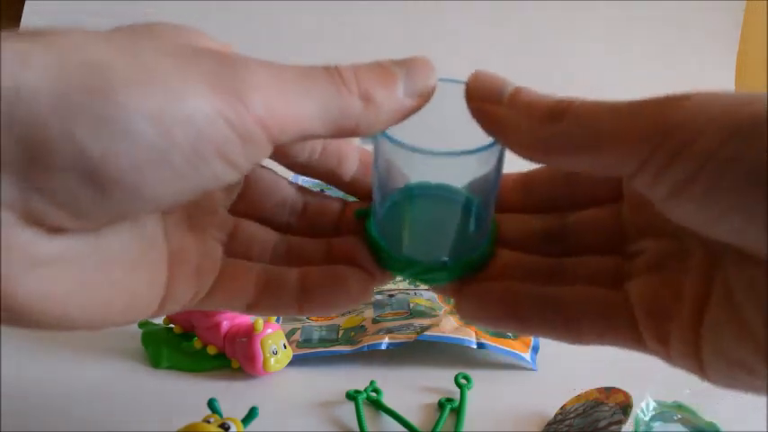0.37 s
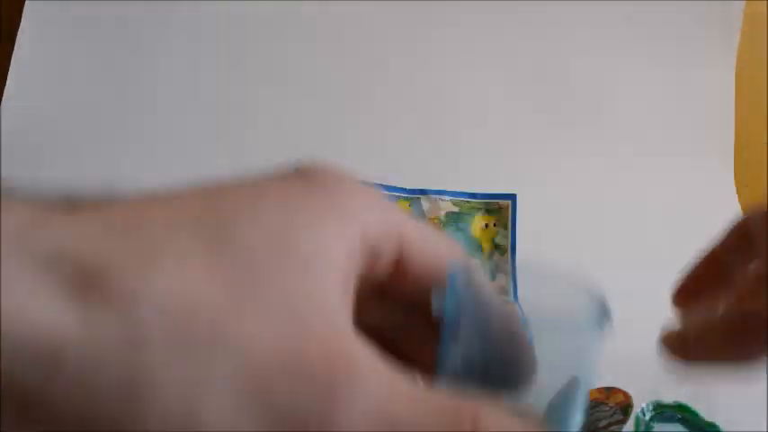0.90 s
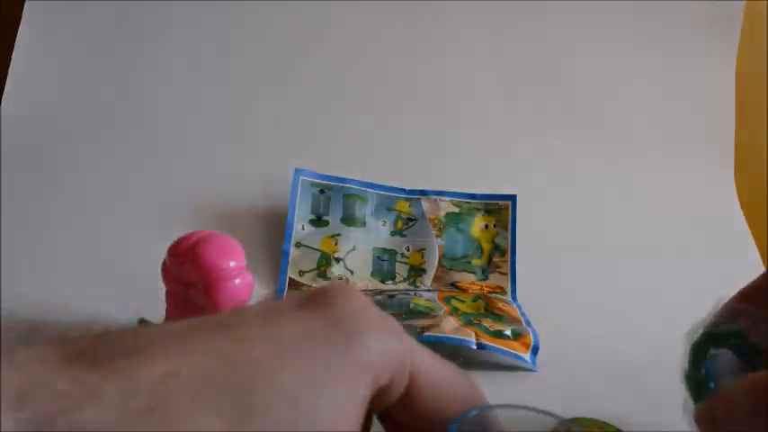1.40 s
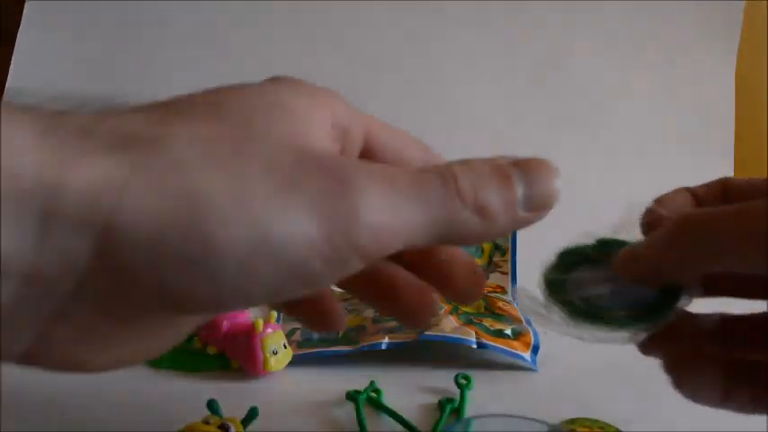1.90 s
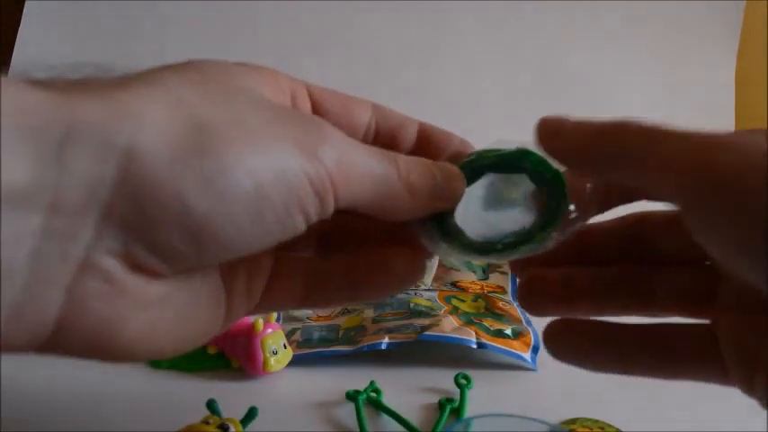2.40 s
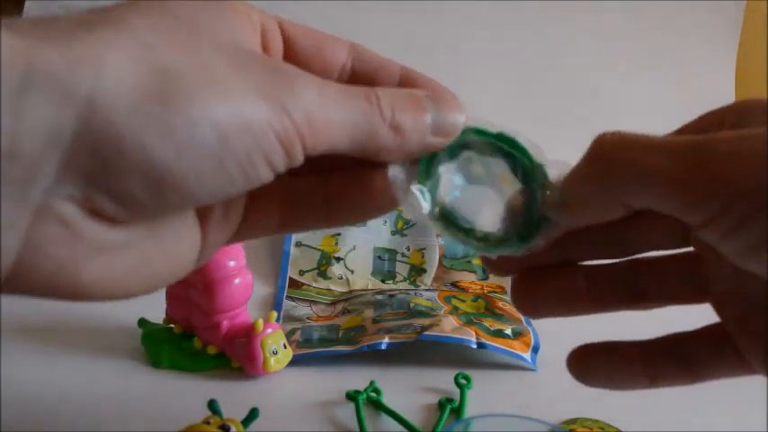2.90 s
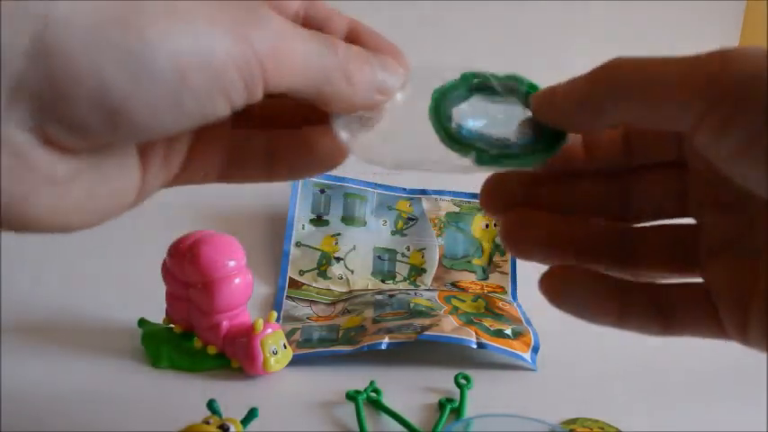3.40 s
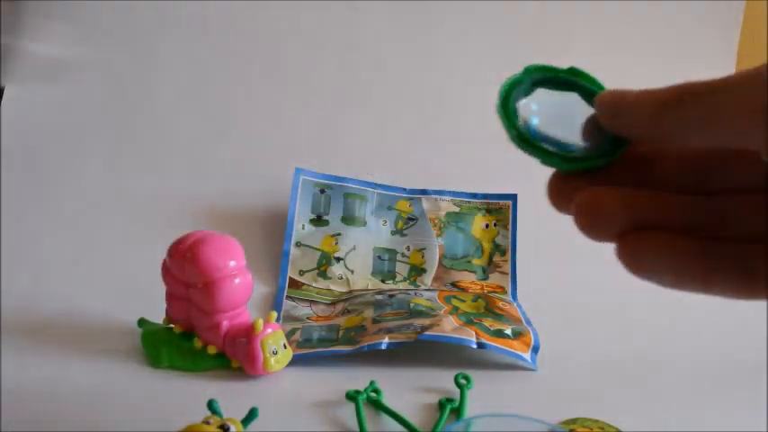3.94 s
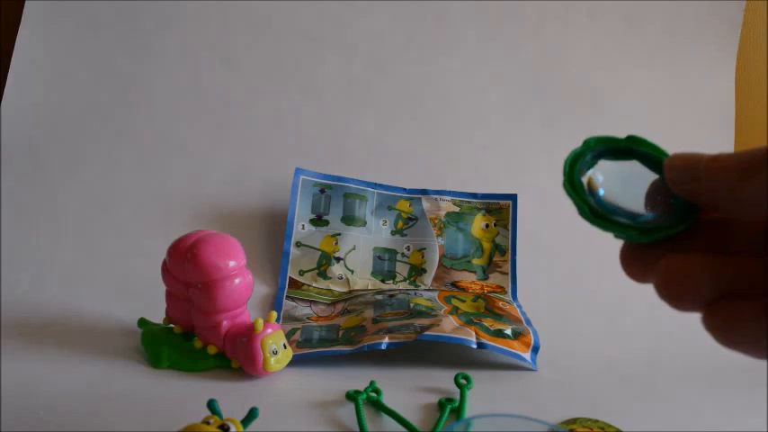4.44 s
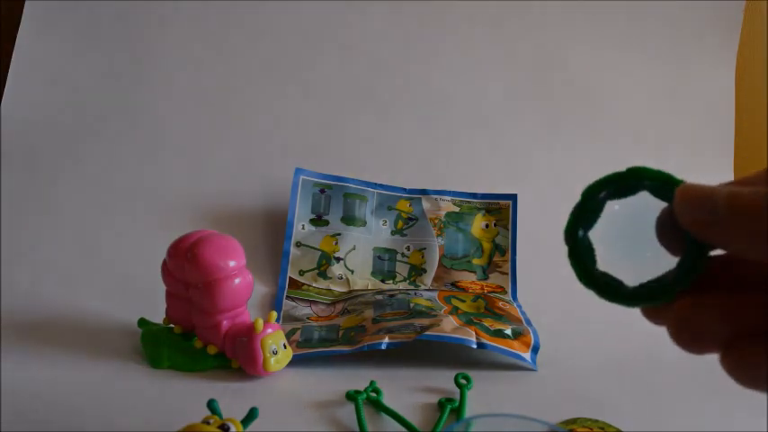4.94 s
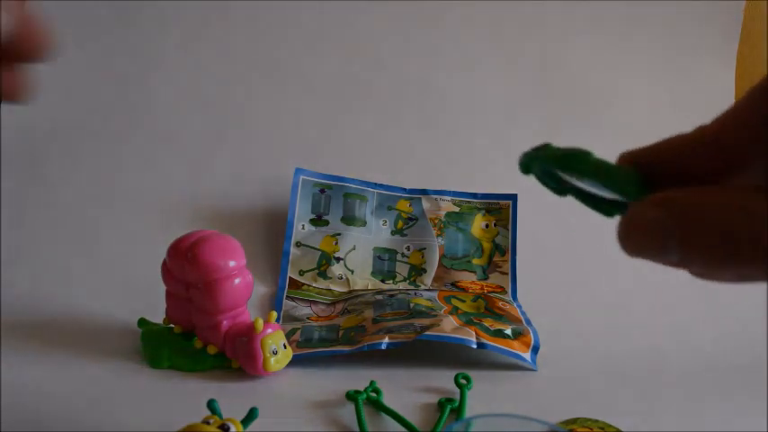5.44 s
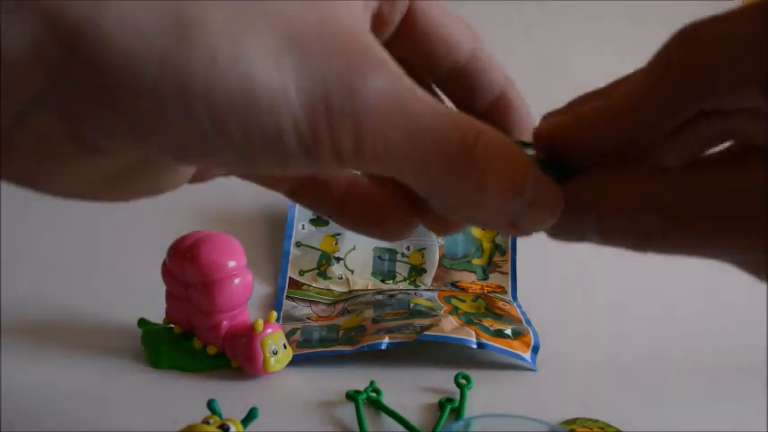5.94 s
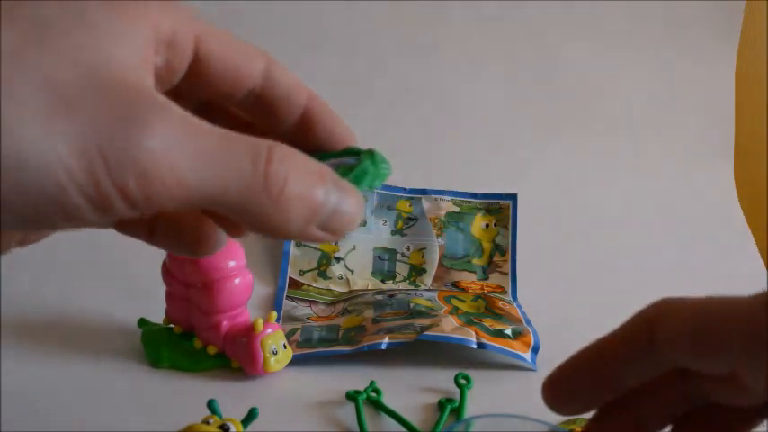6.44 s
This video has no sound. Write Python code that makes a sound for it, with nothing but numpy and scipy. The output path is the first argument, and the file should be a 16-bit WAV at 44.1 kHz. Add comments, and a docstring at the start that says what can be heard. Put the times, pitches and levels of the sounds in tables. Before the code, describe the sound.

Close up in a small room with steady hiss, a light tap and low wobble come first. A plastic cup is put down with hollow knocks and a brief scrape, then stiff clear film crackles and snaps loudly as it is pulled off a plastic ring. The crinkling thins out, leaving near quiet, a few small taps with faint snaps, then only hiss.

```python
"""A part taps a table and the camera stand wobbles, then a plastic cup is set down and slid: ringing modes, low rubbing.
Hands pull a stiff clear film off a toy ring: creases snap as bursts of brief modes over finer random crackle,
while fingers rub and the ring is tapped. Late on, a shell taps the table among a few last snaps.
A small room answers throughout with a bounce and a short noise tail, over steady microphone hiss."""
import sys
import numpy as np
from scipy import signal
from scipy.fft import rfft, irfft
from scipy.io import wavfile
from scipy.ndimage import uniform_filter1d

SR = 44100
rng = np.random.default_rng(int(sys.argv[2]) if len(sys.argv) > 2 else 0)


def gain_from_decibels(decibels):
    """Convert decibel values to linear amplitude factors."""
    exponent = np.asarray(decibels, float) / 20
    return 10 ** exponent


def store_wav(level_fs):
    """Save 16-bit WAV to argv[1]."""
    pcm = np.round(np.clip(np.atleast_2d(level_fs), -1, 1) * 32767)
    wavfile.write(sys.argv[1], SR, pcm.T.astype(np.int16))


N = 290178
T = np.arange(N) / SR

# Creases snapping. Each row: time in s, peak in dB ahead of the room, loudest ring in Hz,
# low end in dB, top end in dB.
CREASE_SNAPS = [(0.048, -34.5, 1680, -1, -9), (0.4364, -34, 1950, 0, -2), (0.624, -43, 1880, 0, 8),
                (0.6304, -38, 2370, -2, -4), (1.181, -43, 6740, -5, -1), (1.1944, -30, 9990, -5, -2),
                (1.2497, -21, 2080, 9, -10), (1.2896, -18.5, 8000, -12, -6), (1.3004, -31, 8800, -5, -4),
                (1.421, -19.5, 7190, -7, -4), (1.4451, -7.5, 8400, -8, 6), (1.4637, -31, 7160, 2, -11),
                (1.4752, -15, 7430, -8, -6), (1.5218, -28.5, 5650, -10, -14), (1.549, -31.5, 1990, -5, -2),
                (1.582, -33.5, 1940, 5, 0), (1.7394, -23.5, 4770, 6, -1.5), (1.7531, -19, 3690, -16, -5),
                (1.8247, -20.5, 7040, 3, -5), (1.8473, -20.5, 8200, 1, 0), (1.859, -32, 6980, -9, -1),
                (1.8944, -15.5, 7000, -9, -4), (1.933, -34, 8420, -6, -15), (1.9674, -12, 9550, -17, -1.5),
                (1.9804, -35, 7540, -10, -22), (1.9905, -21.5, 5340, -8, -4), (2.014, -17.5, 3300, -10, -1),
                (2.0291, -7.5, 8400, -6, 0), (2.0471, -8, 7340, -2, 1), (2.052, -13.5, 9800, -7.5, -9),
                (2.0651, -6, 9600, -11, 3), (2.084, -12.5, 4800, -5, -4), (2.0947, -16, 7360, -6, -7),
                (2.1099, -6, 4480, -8, -8), (2.1393, -3, 3530, -15, 0), (2.177, -17, 9190, -5, 5),
                (2.1817, -18.5, 1790, 1, -5.5), (2.1864, -18.5, 2430, -8, -9),
                (2.2022, -10, 3160, -28, -1.5), (2.2412, -22, 5360, -5, -4), (2.249, -14.5, 5550, -7, 0),
                (2.2609, -8, 5740, -9, 1), (2.2663, -6, 9000, -4, 8.5), (2.2763, -21, 5770, -26, -7),
                (2.2922, -4, 5800, -11, 3.5), (2.2978, -11.5, 5770, -2, 1), (2.3106, -18, 5680, -8, -4),
                (2.3455, -18.5, 9300, 1, 0), (2.364, -13, 3350, -4, 4), (2.3804, -10.5, 6310, -6, -2),
                (2.3875, -2, 8600, -9, 3), (2.3984, -5.5, 5670, -24, -1), (2.4026, -14, 3360, -16, -10),
                (2.5284, -15.5, 7500, -8, -6), (2.5361, -7.5, 8800, -5, -10),
                (2.5632, -9.5, 2900, -1, -1.5), (2.5973, -14, 6240, -8, 4), (2.6224, -20.5, 8500, 2, -4),
                (2.6344, -38, 6840, -4, 2), (2.647, -20, 3260, -2, -14), (2.6657, -4.5, 7800, -13, -8),
                (2.6879, -9, 5660, -15, 5.5), (2.7012, -11.5, 7200, 0, -6),
                (2.7107, -10.5, 9450, -3.5, -4.5), (2.8534, -7, 2890, -8, 0.5), (2.8639, -14, 2940, -5, -4),
                (2.8733, -8, 7900, -1, -5), (2.8813, -4, 5600, -11, -10), (2.9023, -12, 6650, 1, 6),
                (2.9134, -8, 2860, -4, 0), (2.9175, -7, 6800, 4, 4), (2.9251, -7, 4020, -1, -7),
                (2.9317, -11.5, 1710, -8, -4), (2.9444, -34, 6700, -2, 2), (2.9515, -5, 3900, 2, -3),
                (2.9571, -14, 3000, -6, -10), (2.9754, -28, 6170, -7, -7), (2.988, -18.5, 1940, -1, -12),
                (3.0075, -10.5, 3340, 1, -3.5), (3.027, -19, 4000, -12, -15), (3.0402, -6, 4740, -8, -5),
                (3.0433, -12, 2340, 2, -3), (3.0554, -23, 4830, -1, -9), (3.0774, -23, 1660, -8, -8),
                (3.0881, -11, 6860, 0.5, -6), (3.0952, -12, 4130, -2.5, -7), (3.11, -28, 4360, -5, 1),
                (3.1174, -30, 1700, 2, -7.5), (3.1747, -21, 3870, -13, -6), (3.1837, -19, 8800, 3, -3),
                (3.2055, -25, 1620, 10, -4), (3.2205, -26, 2310, 2, -6), (3.263, -20.5, 7100, 7.5, 4),
                (3.2744, -42, 9720, -5, -2), (3.3184, -21.5, 2550, 3, -10), (3.3603, -27.5, 1700, 11, -6),
                (3.4266, -12, 10300, -2.5, -8), (3.4924, -29, 9910, 2, -2), (3.5019, -12, 5700, -5, -2),
                (3.5379, -33, 5460, 2, -2), (3.559, -28, 5270, -5, -4), (3.5926, -25, 1720, -4, -4),
                (3.611, -39, 2010, -5, -6), (3.6742, -34.5, 2280, 3, -7), (3.765, -38, 3140, -5, -2),
                (3.7778, -31, 2870, 12, -9), (3.8062, -30, 7300, 7, 4), (3.8118, -39, 7170, -7, -2),
                (4.2961, -40.5, 4800, -5, 1), (4.377, -39.5, 1680, 17, -12), (4.4326, -31.5, 6700, -2, 5.5),
                (4.6431, -26, 9600, 2, -4), (4.9027, -34.5, 5690, 8, -2), (4.9184, -39, 1920, -1, 6),
                (5.021, -35, 2020, -12, -16), (5.0864, -20.5, 1930, -11, -3.5), (5.1006, -32, 1890, 6, -8),
                (5.1667, -40, 3210, -1, -4), (5.9784, -43, 1500, -8, 7)]
SNAP_T60_S, SNAP_T60_SPREAD = 0.015, 0.17  # ring time at 5 kHz, scatter as a share of it


def snaps():
    """Big creases buckle one by one, each with its own colour and a scattered ring time."""
    out = np.zeros(N)
    chances = rng.random((len(CREASE_SNAPS), 57, 3))
    for (s, peak_db, ring_hz, low_db, top_db), chance in zip(CREASE_SNAPS, chances):
        scatter = 2 * chance[-1, 0] - 1
        t60_s = SNAP_T60_S * (1 + SNAP_T60_SPREAD * scatter)
        add(out, s, gain_from_decibels(peak_db) * crease(chance[:-1], ring_hz, low_db, top_db, t60_s))
    return out


# What a panel of film radiates. Each row: frequency in Hz, relative level in dB per Hz.
FILM_SPECTRUM = [(240, -45), (400, -18.5), (852, -13.5), (1010, -12.5), (1710, -2), (2590, -5.5),
                 (2800, -5), (8900, -0.5), (10700, -1), (16000, -33.5)]
RING_DB, RING_OCTAVES = 10, 0.23  # lift at the loudest ring, its width


def crease(chance, ring_hz, low_db, top_db, t60_s):
    """One buckle: panels around it ring in many brief modes, drawn by chance; peak 1."""
    t = np.arange(1500) / SR
    count = len(chance)
    place, level, start = chance[:, 0], chance[:, 1], chance[:, 2:3]
    hz = 500 * (15500 / 500) ** ((np.arange(count) + place) / count)
    # modes are log-spaced: 10 log hz turns dB per Hz into dB per mode
    db = read(FILM_SPECTRUM, hz) + 10 * np.log10(hz) + 9 * level
    db = db + low_db * np.clip(np.log2(3000 / hz), 0, 1)
    db = db + top_db * np.clip(np.log2(hz / 7000) / 0.14, 0, 1)
    db = db + RING_DB * np.exp(-(np.log2(hz / ring_hz) / RING_OCTAVES) ** 2)
    mode_t60_s = np.clip(t60_s, 0.002, 0.05) * (5000 / hz) ** 0.46  # low modes ring longer
    # the buckle runs along the crease: each mode starts up to 0.6 ms late
    late = np.maximum(t - 0.0006 * start ** 2, 0)
    tick = 1 + 1.46 * np.exp(-late / 0.00082)  # the flip itself is sharp
    swell = (1 - np.exp(-late / 0.0001)) * tick
    decay = 1000.0 ** (-late / mode_t60_s[:, None])
    x = (gain_from_decibels(db)[:, None] * np.sin(2 * np.pi * hz[:, None] * late) * swell * decay).sum(0)
    # a small sheet radiates no bass
    x = signal.sosfilt(signal.butter(4, 640, "high", fs=SR, output="sos"), x)
    return x / np.abs(x).max()


# Hands working the film, in spells. Each row: time in s, crackle level in dB, brightness tilt in dB.
HAND_WORK = [
    [(0.56, -77, -6), (0.629, -51, -3), (0.69, -73, 1)],
    [(1.15, -67, 5), (1.19, -44.5, 7), (1.22, -49, 6.5), (1.25, -65, 2), (1.31, -59, 7.5), (1.405, -67, 1),
     (1.43, -34, 3), (1.47, -36.5, 2.5), (1.51, -43.5, -2), (1.70, -65.5, -6)],
    [(1.701, -64, -6), (1.85, -45, 4), (2.0, -63, 6.5), (2.15, -49.5, -4), (2.42, -42, 0), (2.51, -53, 0),
     (2.55, -40.5, -4.5), (2.83, -72, 5), (2.92, -32.5, -2), (3.1, -49.5, -6.5), (3.22, -37.5, -4.5),
     (3.28, -44.5, -1), (3.357, -38, 0), (3.41, -55, -8), (3.48, -50, 0), (3.55, -36, -1.5),
     (3.65, -62, -10.5), (3.82, -67, -2), (3.866, -50, 6.5), (3.91, -87, -6)],
    [(4.86, -77, -15), (4.928, -46, 2), (4.99, -76, -11), (5.03, -49, -2), (5.07, -84, -13),
     (5.097, -54, -8.5), (5.2, -65, 0), (5.3, -74, -10)],
]
# flurry around a snap: level in dB for a 0 dB snap, share of the snap's dB passed on
AFTER_DB, AFTER_SHARE = -37, 0.7
BUILD_S, FADE_S = 0.004, 0.023  # time constants of its power


def bustle_db():
    """How busy the film is: the work of the hands plus a flurry around every snap."""
    power = gain_from_decibels(curve(HAND_WORK)) ** 2
    for s, peak_db, *_ in CREASE_SNAPS:
        on = slice(max(int((s - 0.1) * SR), 0), int((s + 0.3) * SR))
        late = T[on] - s
        flurry = np.exp(np.minimum(late / BUILD_S, -late / FADE_S))
        power[on] += gain_from_decibels(AFTER_DB + AFTER_SHARE * peak_db) ** 2 * flurry
    return 10 * np.log10(power)


CRACKLE_PER_S = 2000  # all kinds together, ahead of the spells
CRACKLE_SPREAD_DB, CRACKLE_T60_S = 4.5, 0.011  # scale of exponential level draw, ring time at 5 kHz


def crackle(kinds=12):
    """Countless small creases at random moments, most of them faint."""
    bright = 0
    for chance in rng.random((kinds, 40, 3)):
        # each patch of film crackles in spells
        busy = gain_from_decibels(6.2 * noise([(3, -3.0), (40, -2), (90, -33.5)]))
        struck = rng.random(N) < busy * CRACKLE_PER_S / kinds / SR
        hits = struck * gain_from_decibels(CRACKLE_SPREAD_DB * np.minimum(rng.exponential(size=N), 4.0))
        shape = crease(chance, 2000 * 5 ** chance[0, 1], 0, 0, CRACKLE_T60_S)
        bright = bright + signal.fftconvolve(hits, shape)[:N]
    bright = bright / bright.std()
    dull = signal.sosfilt(signal.butter(1, 3000, fs=SR, output="sos"), bright)
    treble = bright - dull
    tilt_db = curve(HAND_WORK, col=2, rest=0)  # looser film sounds duller
    return gain_from_decibels(bustle_db()) * (gain_from_decibels(-tilt_db) * dull + gain_from_decibels(tilt_db) * treble)


# Skin on plastic. Each row: frequency in Hz, relative level in dB per Hz.
GRIP_SPECTRUM = [(60, -33), (130, -8), (250, -4), (450, -3), (700, -3), (1200, -10.5), (2500, -35)]
GRIP_FROM_S, GRIP_DB, GRIP_SHARE = 1.6, -23.5, 0.75  # start, level at 0 dB bustle, share of bustle dB


def grip():
    """Fingers on the ring rub in step with the crackle, once it is picked up."""
    level_db = np.where(T > GRIP_FROM_S, GRIP_DB + GRIP_SHARE * bustle_db(), -120)
    return rub(level_db, GRIP_SPECTRUM)


# Taps on the ring. Each row: time in s, peak in dB ahead of the low cut, contact in ms.
RING_HITS = [(1.999, -30.5, 0.15), (2.047, -27.5, 0.4), (2.138, -24, 0.13), (2.597, -26.5, 0.17),
             (2.852, -25.5, 0.13), (2.874, -29, 0.2), (2.912, -43, 0.23), (3.183, -34, 0.35)]
# Modes of the ring. Each row: frequency in Hz, relative level in dB, t60 in s.
RING_MODES = [(726, -16, 0.021), (868, 5.5, 0.037), (1560, 3, 0.0205)]


def ring_taps():
    """The toy ring is tapped: three short modes."""
    return taps(RING_HITS, RING_MODES)


# Taps of the cup. Each row: time in s, peak in dB ahead of the low cut, contact in ms.
CUP_HITS = [(1.247, -23.5, 0.22), (1.264, -44, 0.91), (1.418, -27.5, 0.35), (1.444, -30, 0.28),
            (1.553, -26.5, 0.53), (3.541, -37, 0.32)]
# Modes of the cup. Each row: frequency in Hz, relative level in dB, t60 in s.
CUP_MODES = [(118, 10, 0.11), (244, 2, 0.11), (335.4, 11, 0.13), (635, 2, 0.029), (860, 23.5, 0.023),
             (1400, -25.5, .03), (2100, -6, .02)]


def cup_taps():
    """The plastic cup knocks on the table: low modes outlast the high ones."""
    return taps(CUP_HITS, CUP_MODES)


# The cup sliding. Each row: time in s, level in dB.
CUP_SLIDE = [
    [(1.13, -60), (1.235, -45), (1.265, -40), (1.314, -50), (1.388, -62), (1.44, -41.5), (1.524, -58.5),
     (1.56, -44), (1.63, -58.5), (1.72, -62)],
]
# Its spectrum. Each row: frequency in Hz, relative level in dB per Hz.
SLIDE_SPECTRUM = [(60, -14), (110, -3.5), (170, -2), (230, 9.5), (280, -11.5), (340, -0.5), (450, -7.5),
                  (620, 2), (850, -6.5), (1500, -7), (2500, -32)]


def cup_slide():
    """The cup drags on the table top: low coloured rubbing noise."""
    return rub(curve(CUP_SLIDE), SLIDE_SPECTRUM)


# Taps of a part. Each row: time in s, peak in dB ahead of the low cut, contact in ms.
PART_HITS = [(0.017, -26.5, 0.22), (0.436, -41, 0.24), (3.777, -36.5, 0.13), (5.019, -38, 0.34)]
# Modes of the part. Each row: frequency in Hz, relative level in dB, t60 in s.
PART_MODES = [(275, -45, 0.013), (500, 4.5, .025), (780, -7, 0.012), (1180, -4, 0.0096), (1443, 1, 0.026),
              (2000, -12, 0.013)]


def part_taps():
    """A part taps the table: short, heavily damped modes."""
    return taps(PART_HITS, PART_MODES)


# Taps of the shell. Each row: time in s, peak in dB ahead of the low cut, contact in ms.
SHELL_HITS = [(4.642, -38.5, 0.11), (5.087, -25.5, 0.3), (5.1, -38, 0.4), (5.125, -39, 0.26),
              (5.17, -38.5, 0.74)]
# Modes of the shell. Each row: frequency in Hz, relative level in dB, t60 in s.
SHELL_MODES = [(181, -24, 0.044), (336, -3, 0.084), (541, 4, 0.11), (660, 8.5, 0.031), (1130, 12, 0.024),
               (2080, -25, .03)]


def shell_taps():
    """A shell taps the table: modes strongest near 1 kHz."""
    return taps(SHELL_HITS, SHELL_MODES)


def taps(rows, modes):
    """A half-sine push rings the modes of the thing; a longer contact is duller."""
    out = np.zeros(N)
    t = np.arange(SR // 5) / SR
    chances = rng.standard_normal((len(rows), len(modes), 2))
    for (s, peak_db, contact_ms), chance in zip(rows, chances):
        ring = 0
        for (hz, db, t60_s), (more_db, detune) in zip(modes, chance * [3, 0.02]):
            tone = np.sin(2 * np.pi * hz * (1 + detune) * t)
            ring = ring + gain_from_decibels(db + more_db) * tone * 1000.0 ** (-t / t60_s)
        contact_s = max(contact_ms, 0.05) / 1000
        push = np.sin(np.pi * np.clip(t[:400] / contact_s, 0, 1))
        ring = signal.fftconvolve(ring, push)[:len(t)]
        add(out, s, gain_from_decibels(peak_db) * ring / np.abs(ring).max())
    # light things move little bass
    return signal.sosfilt(signal.butter(2, 90, "high", fs=SR, output="sos"), out)


def rub(level_db, colour):
    """Uneven rubbing: the grip catches and lets go, so the level wavers."""
    waver = uniform_filter1d(rng.standard_normal(N), size=400) * 20  # rms 1
    return gain_from_decibels(level_db + 3.1 * waver) * noise(colour)


# The camera stand set wobbling. Each row: start in s, hold in s, level in dB.
STAND_SHAKES = [(0.0, 0.11, -48), (0.188, 0.072, -56.5), (1.565, 0.01, -57), (1.80, 0.1, -60)]
SHAKE_RISE_DB_S, SHAKE_FALL_DB_S = 500, 500


def shake():
    """The stand wobbles near 50 Hz, its pace drifting, with a weaker overtone."""
    pace_hz = 47 + 7.05 * noise([(1, -1.5), (12, 4.5), (30, -32)])
    phase = 2 * np.pi * np.cumsum(pace_hz) / SR
    size = 0
    for s, hold_s, db in STAND_SHAKES:
        rise_db = SHAKE_RISE_DB_S * np.maximum(s - T, 0)
        fall_db = SHAKE_FALL_DB_S * np.maximum(T - s - hold_s, 0)
        size = size + gain_from_decibels(db - rise_db - fall_db)
    return size * np.sqrt(2) * (np.sin(phase) + 0.46 * np.sin(2.1 * phase))


# Small room. Each row: frequency in Hz, t60 in s, tail level in dB.
ROOM_TAIL = [(200, 0.42, -37), (803, 0.53, -51.5), (3060, 0.4, -42), (7050, 0.21, -41.5),
             (13000, 0.084, -35.5)]
ECHO_S, ECHO_DB, WALL_S = 0.0025, -18, 0.008


def room(x):
    """A bounce off the table top, then a diffuse tail from the nearest wall on; treble fades faster."""
    t = np.arange(SR // 2) / SR
    hz, s, z = signal.stft(rng.standard_normal(len(t)), SR, nperseg=256)
    decay = 1000.0 ** (-s / read(ROOM_TAIL, hz)[:, None])
    z = z * gain_from_decibels(read(ROOM_TAIL, hz, col=2))[:, None] * decay
    tail = signal.istft(z, SR, nperseg=256)[1][:len(t)]
    tail = tail * np.clip((t - WALL_S) / 0.0007, 0, 1)
    tail[int(ECHO_S * SR)] = gain_from_decibels(ECHO_DB)
    return x + signal.fftconvolve(x, tail)[:N]


# Microphone hiss. Each row: frequency in Hz, relative level in dB per Hz.
HISS_SPECTRUM = [(15, -45), (25, -14), (53, -2.5), (82, -6.5), (185, -6), (293, -7.5), (416, -8),
                 (451, -7.5), (560, -8.5), (1020, -9), (1230, -10.5), (2480, -13.5), (4740, -18),
                 (14000, -22.5), (16000, -30.5)]
HISS_DB = -56


def hiss():
    """Steady microphone noise, falling towards the treble."""
    return gain_from_decibels(HISS_DB) * noise(HISS_SPECTRUM)


def read(table, hz, col=1):
    """A column of a spectrum table on a log-frequency axis."""
    table = np.array(table)
    return np.interp(np.log(np.maximum(hz, 1)), np.log(table[:, 0]), table[:, col])


def curve(spans, col=1, rest=-120):
    """Curves of several spans on one time line, at rest between."""
    out = np.full(N, float(rest))
    for rows in spans:
        rows = np.array(rows)
        on = (T >= rows[0, 0]) & (T <= rows[-1, 0])
        out[on] = np.interp(T[on], rows[:, 0], rows[:, col])
    return out


def noise(colour):
    """Noise of rms 1 with the given spectrum."""
    hz = np.arange(N // 2 + 1) * SR / N
    x = irfft(rfft(rng.standard_normal(N)) * gain_from_decibels(read(colour, hz)), N)
    return x / x.std()


def add(out, s, sound):
    """Mix a short sound in at time s."""
    i = int(s * SR)
    out[i:i + len(sound)] += sound[:N - i]


def scene():
    """Everything near the table sounds in the room; stand and hiss do not."""
    film = snaps() + crackle()
    knocks = ring_taps() + cup_taps() + part_taps() + shell_taps()
    rubbing = grip() + cup_slide()
    return (room(film + knocks + rubbing) + shake() + hiss())[None]


def low_pass(x):
    """Removes everything above the highest recorded frequency."""
    return signal.sosfilt(signal.butter(12, 16970, fs=SR, output="sos"), x)


def record(dry):
    """Peaks are clipped at full scale."""
    mix = np.clip(dry, -1, 1)
    return low_pass(mix)


dry = scene()
out = record(dry)
store_wav(out)
```